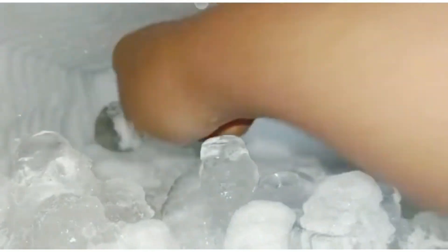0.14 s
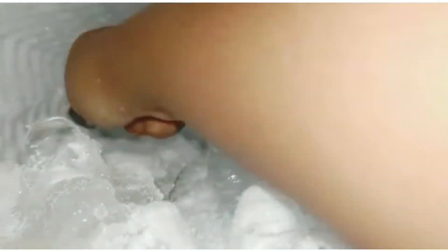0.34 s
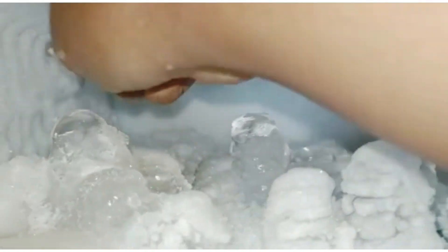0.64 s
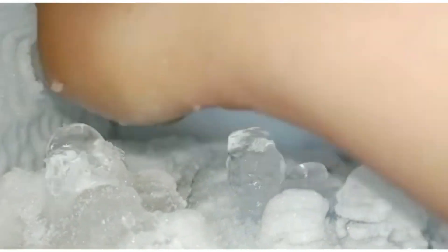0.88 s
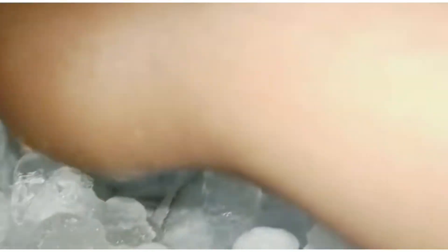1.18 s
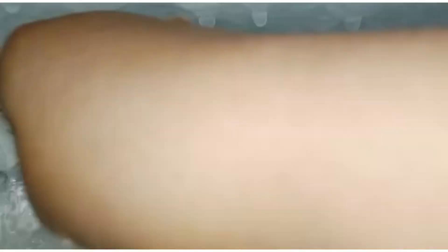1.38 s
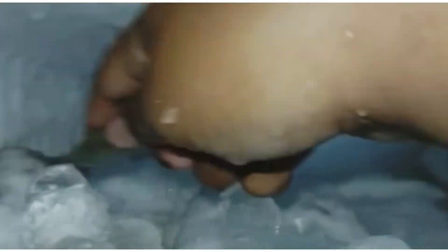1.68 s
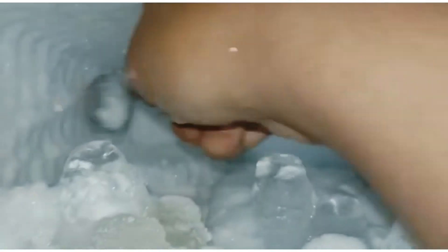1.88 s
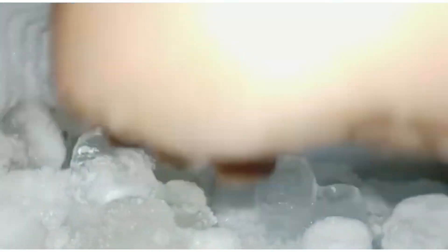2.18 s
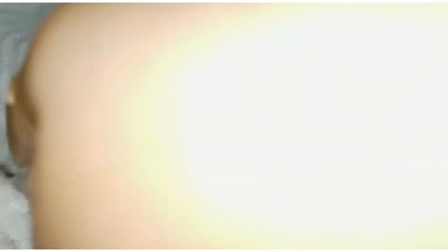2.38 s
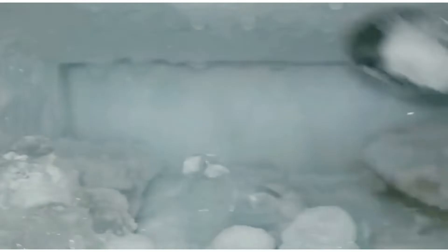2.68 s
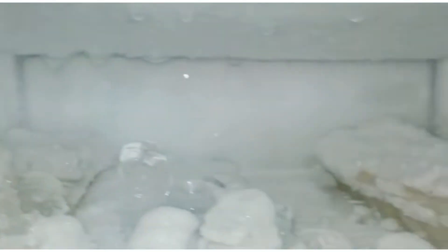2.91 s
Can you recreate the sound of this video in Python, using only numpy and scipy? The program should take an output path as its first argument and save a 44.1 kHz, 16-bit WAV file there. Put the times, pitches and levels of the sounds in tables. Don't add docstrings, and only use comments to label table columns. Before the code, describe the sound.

After a faint sleeve rub, a spoon edge crunches into frost inside a humming freezer, first lightly, then loudly, then again after a short pause; a knock and small ticking chips follow, captured close with peaks distorting.

```python
import sys
import numpy as np
from scipy import signal
from scipy.fft import rfft, irfft
from scipy.io import wavfile

SR = 44100
rng = np.random.default_rng(int(sys.argv[2]) if len(sys.argv) > 2 else 0)


def dump(signal):
    limited = np.clip(np.atleast_2d(signal).T, -1, 1)
    pcm = np.round(limited * 32767).astype(np.int16)
    wavfile.write(sys.argv[1], SR, pcm)


def rack_gain(trim_db):
    fader = np.asarray(trim_db, float)
    return 10 ** (fader / 20)


N = 134505

# (start [s], length [s], grit [dB], wall [dB], crunch [dB])
FIRST_STROKE = [(0.4, 0.0025, -36, -21.0, -15), (0.405, 0.02, -38, -15.5, -29),
                (0.442, 0.017, -42, -21.0, -19), (0.461, 0.03, -26, -19, -16.0),
                (0.508, 0.019, -23, -23.5, -22), (0.532, 0.016, -14.5, -14.0, -11.5),
                (0.554, 0.015, -25, -42, -19), (0.574, 0.027, -12.5, -12.5, -14.0),
                (0.603, 0.016, -19.5, -44, -26), (0.632, 0.032, -10.5, -23, -11.5),
                (0.671, 0.012, -25, -28, -25), (0.687, 0.0096, -10.5, -24, -17),
                (0.698, 0.026, -13.5, -9.5, -8.0), (0.739, 0.0055, -18.5, -34, -19.0),
                (0.777, 0.019, -11.5, -18, -11), (0.799, 0.026, -12.5, -22.5, -13.5),
                (0.827, 0.0094, -15.5, -18, -19), (0.857, 0.0061, -18.5, -22.0, -21),
                (0.888, 0.007, -15.5, -16, -17), (0.937, 0.0013, -20.5, -40.0, -41),
                (0.952, 0.0018, -7, -17, -12), (0.962, 0.0053, -9, -6, -6.5), (0.982, 0.021, -5, -8, -8),
                (1.03, 0.0087, -20.0, -30, -19.0)]
LATE_BITES = [
    (1.477, 0.011, -8.5, -16.5, -4.0),
    (1.502, 0.0085, -20.0, -37, -24.0),
    (1.537, 0.018, -6.5, -15, -4.5),
]
SECOND_STROKE = [(1.231, 0.004, -8.5, -13.0, -6), (1.242, 0.023, -6.5, -10.5, -2),
                 (1.278, 0.0086, -8.5, -15, -0.5), (1.305, 0.011, -5.5, -13, -4.5),
                 (1.335, 0.013, -3, -15, -1), (1.351, 0.021, -14.5, -15.5, -12.5),
                 (1.377, 0.0066, -22, -18.5, -13), (1.39, 0.018, -16, -11.5, -13.5),
                 (1.42, 0.0092, -13.5, -23.5, -10)]
THIRD_STROKE = [(1.987, 0.015, -21.0, -15.5, -16.5), (2.009, 0.013, -36, -28, -22),
                (2.025, 0.024, -15.5, -18.5, -14.0), (2.057, 0.032, -16.0, -39, -15),
                (2.093, 0.005, -17, -5, -7), (2.102, 0.016, -18, -27, -21), (2.126, 0.0099, -11, -25, -8),
                (2.141, 0.0061, -8.5, -4, -2.5), (2.163, 0.0046, -25, -25, -11),
                (2.185, 0.0043, -6, -7.5, -1.5), (2.198, 0.01, -6, -32, -2.5),
                (2.22, 0.025, -8.5, -14.5, -7), (2.252, 0.02, -18.0, -39, -14),
                (2.277, 0.019, -10, -13, -7.5), (2.346, 0.025, -13.0, -26.5, -20.5),
                (2.374, 0.006, -33, -44, -22), (2.391, 0.018, -9.5, -22, -15),
                (2.42, 0.04, -17.5, -24.5, -19.5), (2.468, 0.02, -19, -20.5, -17.5),
                (2.496, 0.017, -27, -39, -29.0)]
CHIPS = [(0.178, 0.003, -38, -49, -51), (0.291, 0.0032, -38, -51, -31), (1.583, 0.0043, -28.5, -45, -32),
         (1.635, 0.006, -33, -48, -33.0), (1.659, 0.0032, -32, -55, -43), (1.672, 0.003, -43, -46, -45),
         (1.725, 0.0058, -30.0, -48, -37.0), (1.738, 0.003, -26.5, -55, -24),
         (1.765, 0.0094, -27, -44, -42.0), (1.819, 0.0033, -32, -36.5, -8), (1.827, 0.011, -25.5, -52, -27),
         (1.884, 0.0051, -33, -49, -36), (1.905, 0.004, -34, -51, -27.5), (2.539, 0.0036, -19.5, -1, -23),
         (2.552, 0.04, -39, -29.5, -49), (2.63, 0.0083, -23, -33, -30), (2.65, 0.021, -29, -45, -32),
         (2.71, 0.0044, -28.0, -58, -40), (2.733, 0.0028, -25, -46, -35), (2.745, 0.0092, -28, -49, -25.5),
         (2.77, 0.0064, -30, -46, -46), (2.866, 0.0012, -12, -29, -12), (2.899, 0.001, -11.5, -27.0, -7),
         (2.901, 0.015, -22, -44, -16), (2.985, 0.013, -26, -63, -27), (3.048, 0.002, -17.5, -47, -24)]
# (frequency [Hz], width [Hz], first grip [dB], second grip [dB], third grip [dB])
SPOON_RINGS = [(1947, 350, -2.5, -4.5, -2), (2427, 170, 5.5, 5, 0.5), (2990, 290, -2, -1, -1),
               (4145, 200, 0.5, -6, 0.5), (5860, 240, -5.5, 8, -6), (6950, 890, -5, -3, -3),
               (8950, 1340, -11.5, -14, -13.5), (11050, 520, -1.5, -11, -11.5),
               (11660, 280, -13.5, -4.5, -1), (12370, 520, -4, -5, -5), (14300, 910, -9, -9.5, -8.5)]
# (frequency [Hz], width [Hz], level [dB])
CHIP_RINGS = [(2450, 400, 4), (11800, 2000, -7)]
# (lag of left port [samples], left over right [dB])
PLACES = [
    (-7, -1.5),
    (-3, 0),
    (59.5, -2),
    (12, 2.5),
]
# (time [s], light drag [dB], push on box [dB])
HAND = [(0.0, -30, -18), (.13, -44, -32.5), (.18, -35, -14), (.38, -29.5, -32), (.5, -19.5, -23.5),
        (.72, -19.5, -13.5), (.9, -32.5, -17), (1.06, -29, -17), (1.208, -40, -43), (1.248, -9.5, -12),
        (1.42, -46, -15), (1.46, -23, -14.5), (1.62, -28.5, -21.5), (1.97, -30, -28.5), (2.198, -14.5, -14),
        (2.5, -27, -26), (2.82, -35, -40.5), (2.92, -18.5, -25)]
# (frequency [Hz], density [dB per Hz])
GRIT_COLOUR = [(700, -36), (1300, -2), (3000, -2), (4200, 4), (10000, -2), (15600, -7)]
# (frequency [Hz], width [Hz], level [dB])
WALL_RINGS = [(420, 37, 5), (514.6, 33, 4), (614, 117, 5.5), (879, 44, 5), (972, 69, 6), (1202, 106, -12.5),
              (1390, 290, 0)]
# (frequency [Hz], width [Hz], level [dB])
BOX_RINGS = [(103.2, 8.3, 2.5), (141.6, 19.3, 1), (187, 17.2, 1.5), (209, 8.3, -7), (306, 13, -28)]
# (time [s], peak [dB], frequency [Hz])
BUMPS = [(0.146, -3, 138), (0.783, -3, 212), (0.819, 2.5, 211.8), (0.951, -0.5, 201), (1.005, 2, 103),
         (1.291, 0.5, 219), (1.477, 0, 218), (1.54, 5, 228.4), (1.818, -10.5, 122), (1.863, -6, 394),
         (1.875, -11.5, 262), (1.923, -4.5, 124.4), (2.11, -3.5, 229), (2.185, 3, 257), (2.537, -3, 230)]
# (frequency [Hz], level [dB], T60 [s])
KNOCK_MODES = [(943, 6, 0.033), (480, -0.5, .035), (740, -15.5, 0.033), (314, -6, 0.059)]
# (time [s], level [dB])
RUB = [
    (0.142, -35),
    (.205, -22),
    (.42, -49),
]
# (frequency [Hz], density [dB per Hz])
FLOOR_COLOUR = [(15, -44), (25, -8.5), (188, 3.5), (1240, -21.5), (2440, -16), (12600, -43), (15600, -62)]

GRIT_DB, CRUNCH_DB, DRAG_GRIT_DB, RING_SHARE_DB = -8, 2, -4.0, 3
CRUNCH_TOP_HZ, GRIT_FOOT_HZ = 3350, 3750
TREBLE_HZ, TREBLE_LEFT_DB = 5000, 8
CRYSTALS_PER_S, SIZE_SPREAD_DB = 10000, 4
FLUTTER_DB, FLUTTER_HZ = 2.0, 150
PATCH_DB, PATCH_HZ, RING_CHANCE_DB = 2.5, 40, 2.2
ATTACK_S, RELEASE_S, TAIL_S, TAIL_DB = .0007, .002, .012, -18
CRACK_S, SWELL_SHARE = .002, .08
GRIT_ALIKE, WALL_ALIKE = .52, 0.75
ECHO_T60_S, ECHO_DB = .025, -9
WALL_DB, WALL_TOP_HZ, WALL_LEFT_DB = -4.5, 2260, 1.2
BOX_DB, BITE_SHARE, NARROWEST_HZ = 0.5, 0.7, 22
LOW_CUT_HZ, BOOM_LEFT_DB = 85, -4.0
BUMP_T60_S, BUMP_DB, BUMP_DULL_HZ = 0.14, -5.5, 235
KNOCK_S, KNOCK_RISE_S = 2.538, 0.0016
RUB_LOW_HZ, RUB_HIGH_HZ = 252, 445
FLOOR_DB, FLOOR_DRIFT_DB, FLOOR_DRIFT_HZ = -32, 2.8, 1.1
OVERLOAD_TOP, TREBLE_CUT_HZ = 1.1, 16100


def rms_one(x):
    return x / np.sqrt(np.mean(x ** 2) + 1e-20)


def butter(x, order, hz, kind="low"):
    return signal.sosfilt(signal.butter(order, hz, kind, fs=SR, output="sos"), x)


def left_right(left_db):
    return rack_gain(np.array([[left_db / 2], [-left_db / 2]]))


def drift(rate_hz):
    r = np.exp(-2 * np.pi * rate_hz / SR)
    noise = rng.standard_normal(N + SR)
    return rms_one(signal.lfilter([1], [1, -2 * r, r * r], noise)[SR:])


def resonance(x, hz, width_hz):
    r = np.exp(-np.pi * width_hz / SR)
    zeros = np.sqrt(1 - r * r) / np.sqrt(2) * np.array([1, 0, -1])
    poles = [1, -2 * r * np.cos(2 * np.pi * hz / SR), r * r]
    return signal.lfilter(zeros, poles, x + 1e-18)


def colour(x, spectrum):
    points = np.array(spectrum)
    hz = np.arange(N // 2 + 1) * SR / N + 1
    level_db = np.interp(np.log(hz), np.log(np.maximum(points[:, 0], 1)), points[:, 1])
    return irfft(rfft(x) * rms_one(rack_gain(level_db)), N)


def hand(column):
    rows = np.array(HAND)
    return rack_gain(np.interp(np.arange(N) / SR, rows[:, 0], rows[:, column]))


def crystals(alike, lag):
    size_db = SIZE_SPREAD_DB * np.minimum(rng.exponential(1, (3, N)), 4)
    sizes = rack_gain(size_db) * rng.choice([-1, 1], (3, N))
    snaps = sizes * (rng.random((3, N)) < CRYSTALS_PER_S / SR)
    shared = np.array([np.roll(snaps[0], int(lag)), snaps[0]])
    both = np.sqrt(alike) * shared + np.sqrt(1 - alike) * snaps[1:]
    return rms_one(both * rack_gain(FLUTTER_DB * drift(FLUTTER_HZ)))


def pressure(bites, levels_db):
    out = np.zeros(N)
    for (start_s, length_s, *_), db in zip(bites, levels_db):
        i = max(int((start_s - .04) * SR), 0)
        t = np.arange(i, min(i + int((length_s + .14) * SR), N)) / SR - start_s
        after = np.maximum(t - length_s, 0)
        swell_s = SWELL_SHARE * length_s
        rise = np.exp(np.minimum(t, 0) / max(ATTACK_S, swell_s - ATTACK_S))
        crack = 1 + np.exp(-np.abs(t) / CRACK_S - swell_s / ATTACK_S / 2)
        fall = np.exp(-after / RELEASE_S) + rack_gain(TAIL_DB) * np.exp(-after / TAIL_S)
        out[i:i + len(t)] += rack_gain(db) * rise * crack * fall
    return out


def rung(snaps, bites, column, rings, steady):
    level_db = np.array(bites)[:, column]
    chance = rng.standard_normal((len(bites), len(rings)))
    shares = np.array([rack_gain(db) * np.sqrt(width) for _, width, db in rings])
    shares = shares / np.sqrt(np.sum(shares ** 2))
    out = 0
    for k, (hz, width_hz, _) in enumerate(rings):
        force = steady + pressure(bites, level_db + RING_CHANCE_DB * chance[:, k])
        patches = rack_gain(PATCH_DB * drift(PATCH_HZ))
        out = out + shares[k] * resonance(snaps * patches * force, hz, width_hz)
    return out


def ports(x, left_db):
    t = np.arange(1500) / SR
    echo = rng.standard_normal((2, len(t))) * rack_gain(-60 * t / ECHO_T60_S)
    echo = rack_gain(ECHO_DB) * echo / np.sqrt(np.sum(echo ** 2, axis=1))[:, None]
    echo[:, 0] = 1
    return signal.fftconvolve(x, echo, axes=1)[:, :N] * left_right(left_db)


def frost():
    t = np.arange(N) / SR
    grips = [[(row[0], row[1], row[2 + k]) for row in SPOON_RINGS] for k in range(3)] + [CHIP_RINGS]
    strokes = (FIRST_STROKE + LATE_BITES, SECOND_STROKE, THIRD_STROKE, CHIPS)
    ends_s = [sum(bites[-1][:2]) for bites in (FIRST_STROKE, LATE_BITES, THIRD_STROKE)]
    drag_s = [0] + ends_s + [N / SR]
    halves = ((4, "low", CRUNCH_TOP_HZ, CRUNCH_DB, 0), (2, "high", GRIT_FOOT_HZ, 0, DRAG_GRIT_DB))
    out = 0
    for k, (bites, rings, (lag, left_db)) in enumerate(zip(strokes, grips, PLACES)):
        snaps = crystals(GRIT_ALIKE, lag)
        drag = hand(column=1) * (t >= drag_s[k]) * (t <= drag_s[k + 1])
        all_power = sum(rack_gain(db) ** 2 * width for _, width, db in rings)
        layers = 0
        for column, side, edge_hz, level_db, drag_db in halves:
            own = [ring for ring in rings if (ring[0] < CRUNCH_TOP_HZ) == (side == "low")]
            share = np.sqrt(sum(rack_gain(db) ** 2 * width for _, width, db in own) / all_power)
            steady = drag * rack_gain(drag_db)
            force = steady + pressure(bites, np.array(bites)[:, column])
            crush = butter(colour(snaps * force, GRIT_COLOUR), 5, edge_hz, side)
            ringing = share * rack_gain(RING_SHARE_DB) * rung(snaps, bites, column, own, steady / 2)
            layers = layers + rack_gain(level_db) * (crush + ringing)
        out = out + ports(layers, left_db)
    dull = butter(out, 1, TREBLE_HZ)
    return rack_gain(GRIT_DB) * (dull + (out - dull) * left_right(TREBLE_LEFT_DB))


def wall():
    bites = FIRST_STROKE + SECOND_STROKE + LATE_BITES + THIRD_STROKE + CHIPS
    x = rung(crystals(WALL_ALIKE, -10), bites, 3, WALL_RINGS, hand(column=1) / 2)
    return rack_gain(WALL_DB) * ports(butter(x, 2, WALL_TOP_HZ), WALL_LEFT_DB)


def box():
    bites = FIRST_STROKE + SECOND_STROKE + LATE_BITES + THIRD_STROKE
    biting = np.minimum(pressure(bites, np.zeros(len(bites))), 1)
    shake = rng.standard_normal(N) * hand(column=2) * (1 - BITE_SHARE + BITE_SHARE * biting)
    rings = sum(rack_gain(db) * resonance(shake, hz, max(width, NARROWEST_HZ)) for hz, width, db in BOX_RINGS)
    out = rack_gain(BOX_DB) * rings / 2
    t = np.arange(SR // 2) / SR
    for start_s, db, hz in BUMPS:
        i = int(start_s * SR)
        fall_db = 60 * t / BUMP_T60_S * max(hz / BUMP_DULL_HZ, 1) ** 2
        thud = rack_gain(db + BUMP_DB - fall_db) * np.sin(2 * np.pi * hz * t)
        out[i:i + len(t)] += thud[:N - i]
    return butter(out, 3, LOW_CUT_HZ, "high") * left_right(BOOM_LEFT_DB)


def knock():
    t = np.maximum(np.arange(N) / SR - KNOCK_S, 0)
    modes = sum(rack_gain(db - 60 * t / t60_s) * np.sin(2 * np.pi * hz * t) for hz, db, t60_s in KNOCK_MODES)
    return (1 - np.exp(-t / KNOCK_RISE_S)) * modes


def sleeve():
    time_s, level_db = np.transpose(RUB)
    level = np.interp(np.arange(N) / SR, time_s, rack_gain(level_db), left=0, right=0)
    rub = rms_one(butter(rng.standard_normal(N), 3, [RUB_LOW_HZ, RUB_HIGH_HZ], "band"))
    return rub * level * rack_gain(2 * drift(FLUTTER_HZ / 4))


def machine():
    mid = colour(rng.standard_normal(N), FLOOR_COLOUR)
    side = butter(colour(rng.standard_normal(N), FLOOR_COLOUR), 1, 500, "high")
    level_db = FLOOR_DB + FLOOR_DRIFT_DB * drift(FLOOR_DRIFT_HZ)
    return rack_gain(level_db) * (mid + side * [[1], [-1]])


def scene():
    return frost() + wall() + box() + knock() + sleeve() + machine()


def band_limit(x):
    return signal.sosfilt(signal.butter(12, 15770, fs=SR, output="sos"), x)


def record(dry):
    squeezed = dry / (1 + np.abs(dry / OVERLOAD_TOP) ** 4) ** (1 / 4)
    treble_cut = signal.cheby2(12, 40, TREBLE_CUT_HZ, fs=SR, output="sos")
    return band_limit(signal.sosfilt(treble_cut, squeezed))


dry = scene()
out = record(dry)
dump(out)
```